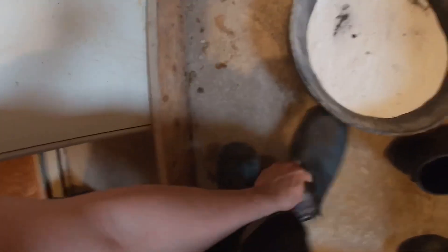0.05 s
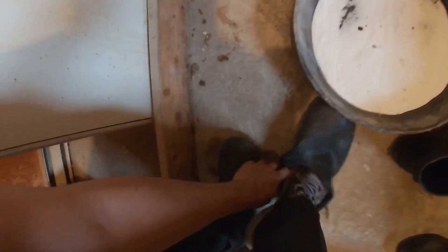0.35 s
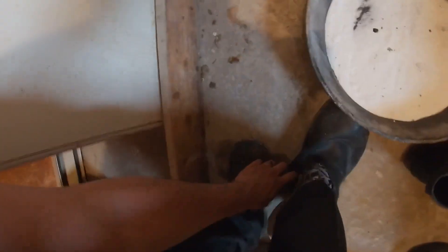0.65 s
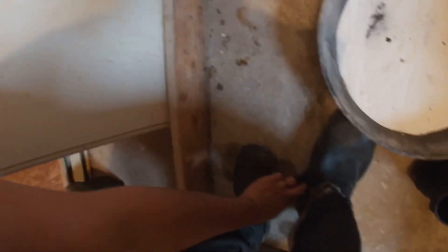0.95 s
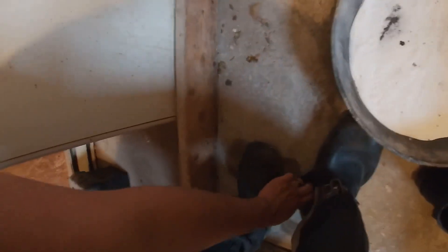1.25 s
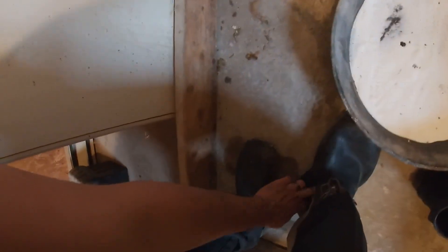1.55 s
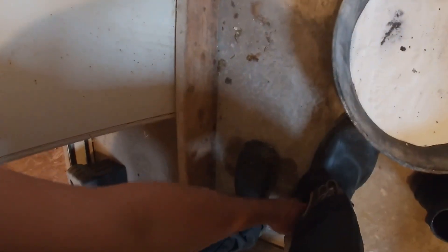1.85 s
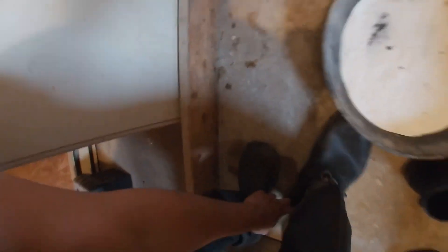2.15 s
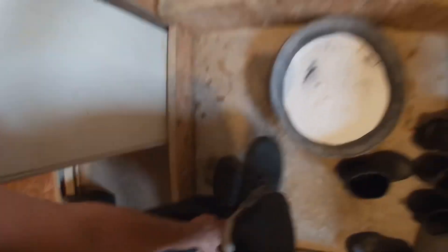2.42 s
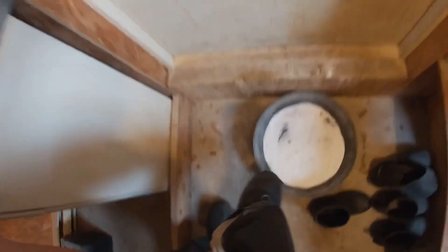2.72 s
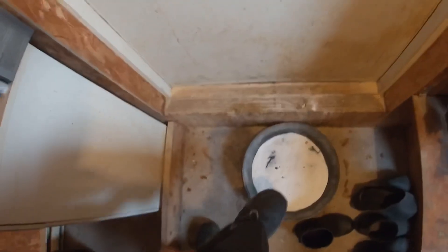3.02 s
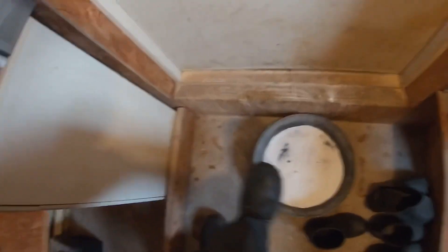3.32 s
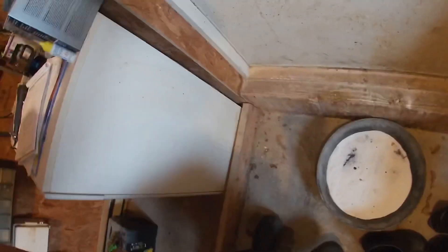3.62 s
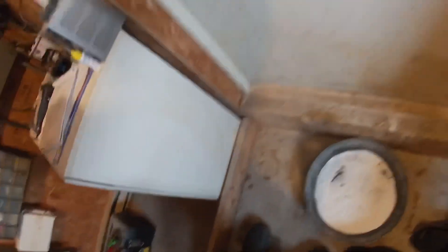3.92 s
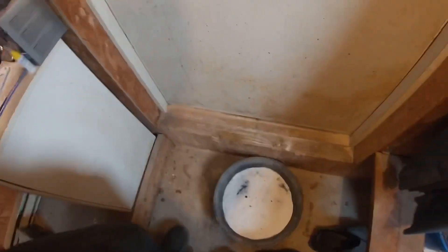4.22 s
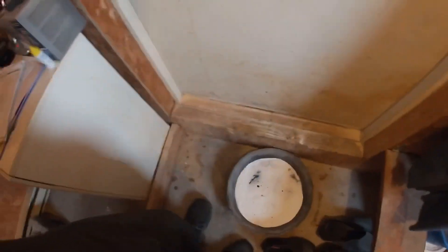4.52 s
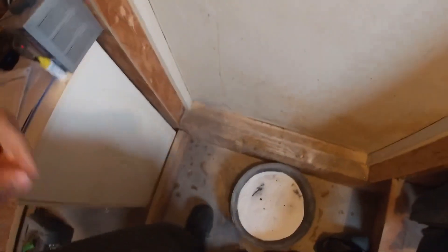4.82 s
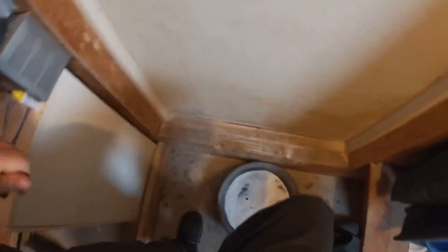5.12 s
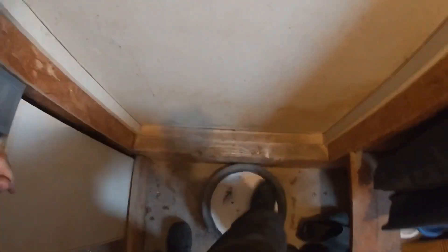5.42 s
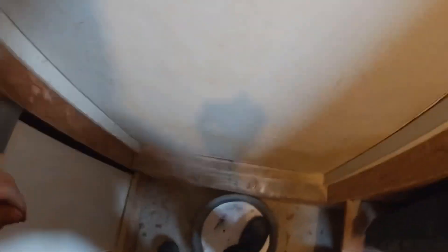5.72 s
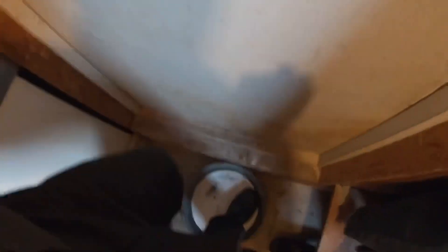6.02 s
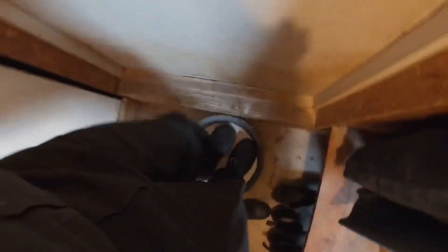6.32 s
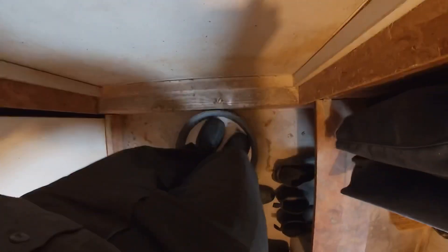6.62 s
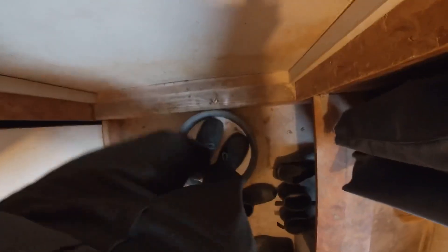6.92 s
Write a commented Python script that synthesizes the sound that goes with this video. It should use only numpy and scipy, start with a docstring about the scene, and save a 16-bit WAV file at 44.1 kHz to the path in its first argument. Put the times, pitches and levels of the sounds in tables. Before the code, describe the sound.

Someone treads into boots and steps onto a pad: hollow knocks, sole scuffs, cloth rustle and faint squeaks over slow ticking.

```python
"""Boots knock and scuff as someone treads into them in a small porch and steps onto a pad in a shallow tub.
Each knock rings the floor and the hollow boot, or the tub once the boots reach it; leather rubs, soles drag and
rubber squeaks on the pad. Trousers swish, a hand-held camera rumbles and gets bumped, and an appliance ticks
about once a second. Just before the fourth second the sound turns bright and hissy, then slowly dulls again
from the top."""
import sys
import numpy as np
from scipy import signal
from scipy.fft import rfft, irfft, next_fast_len
from scipy.io import wavfile
from scipy.ndimage import uniform_filter1d, map_coordinates

SR = 44100
rng = np.random.default_rng(int(sys.argv[2]) if len(sys.argv) > 2 else 0)


def put_to_file(sound):
    """Save the sound as 16-bit audio at rate SR, in the file named by the first command-line argument."""
    columns = np.atleast_2d(sound).T  # one column per channel
    safe = np.clip(columns, -1, 1)
    whole_steps = np.round(safe * 32767)
    wavfile.write(sys.argv[1], SR, whole_steps.astype(np.int16))


N = 315647


def amp(db):
    """Turn decibels into a gain."""
    return 10 ** (np.asarray(db) / 20)


def unit(x):
    """Scale a sound to an average (rms) level of 1."""
    return x / np.sqrt(np.mean(x ** 2) + 1e-20)


def unit_hit(x):
    """Scale a hit so that its loudest 8 ms have an average level of 1."""
    return x / np.sqrt(uniform_filter1d(x ** 2, size=SR // 125).max())


def value_at(points, hz):
    """Read between (pitch_hz, value) points, with octaves evenly spaced."""
    pitches, values = np.transpose(points)
    return np.interp(np.log(hz + 1), np.log(pitches + 1), values)


def wobble(turns_per_s):
    """A smooth random curve."""
    points = rng.standard_normal(int(N * turns_per_s / SR) + 4)
    return map_coordinates(points, [np.arange(N) * turns_per_s / SR])


def add(track, start_s, sound):
    """Mix a sound into the track."""
    part = track[max(round(start_s * SR), 0):][:len(sound)]
    part += sound[:len(part)]


def filtered(x, response):
    """Multiply each frequency of a sound by response(hz)."""
    size = next_fast_len(len(x) + SR // 6)
    return irfft(rfft(x, size) * response(np.fft.rfftfreq(size, 1 / SR)), size)[:len(x)]


def coloured(x, spectrum):
    """Shape a sound's tone with (pitch_hz, level_db) points."""
    return filtered(x, lambda hz: amp(value_at(spectrum, hz)))


def resonate(x, resonances):
    """Pass a sound through an object that rings at several pitches."""
    return filtered(x, lambda hz: sum(amp(db) * 1j * hz * width / (pitch**2 - hz**2 + 1j * hz * width)
                                      for pitch, width, db in resonances))


def band(x, low_hz, high_hz):
    """Keep a band of frequencies at least an octave wide."""
    edges_hz = [low_hz, np.clip(high_hz, 2 * low_hz, SR / 2 - 1)]
    return signal.sosfilt(signal.butter(3, edges_hz, "band", fs=SR, output="sos"), x)


def lowpass(hz, edge_hz, order):
    """A gain that falls above edge_hz; a higher order falls more steeply."""
    return 1 / np.sqrt(1 + (hz / edge_hz) ** (2 * order))


def ping(t, hz, fade_s, attack_s=0.00034):
    """One ringing tone. Here and below, fade_s is the time to fall by 60 dB."""
    return amp(-60 * t / fade_s) * np.sin(2 * np.pi * hz * t) * (1 - np.exp(-t / attack_s))


def friction(spectrum, slips_per_s, rough_db):
    """Rubbing noise: a surface catches and slips many times a second."""
    return unit(coloured(rng.standard_normal(N) * amp(rough_db * wobble(slips_per_s)), spectrum))


def strokes(rows, stretch=1, rise_share=0.44):
    """The gain of a series of swells, each rising a little faster than it falls."""
    power = np.zeros(N)
    for peak_s, db, length_s in rows:
        span_s = stretch * length_s
        start_s = max(peak_s - 2 * span_s, 0)
        t = np.arange(start_s - peak_s, 2 * span_s, 1 / SR)
        slope_s = span_s * np.where(t < 0, rise_share, 1 - rise_share)
        add(power, start_s, amp(db) ** 2 * np.exp(-2 * (t / slope_s) ** 2))
    return np.sqrt(power)


def slipping_tones(rows, partials, spread, sag):
    """Fast sticking and slipping makes fuzzy tones whose pitch sags as each rub slows."""
    out, t = np.zeros(N), np.arange(-SR // 3, SR // 3) / SR
    for peak_s, db, length_s, hz in rows:
        phase = 2 * np.pi * hz * np.cumsum(1 - sag * np.tanh(t / length_s)) / SR
        tone = 0
        for ratio, part_db in partials:
            narrow = signal.butter(2, np.clip(spread * ratio * hz, 5, 2000), fs=SR, output="sos")
            fuzz = signal.sosfilt(narrow, rng.standard_normal((2, len(t))))
            tone += amp(part_db) * unit(fuzz[0] * np.cos(ratio * phase) + fuzz[1] * np.sin(ratio * phase))
        add(out, peak_s + t[0], amp(db) * unit(tone) * np.exp(-(2 * t / length_s) ** 2))
    return out


BRIGHT_START_S, OPEN_S, HOLD_S = 3.875, 0.041, 0.25
DULL_HZ, BRIGHT_HZ, SINK_HZ_PER_S = 3400, 10100, 2130
def treble_edge(s):
    """The highest clear frequency at time s: dull, suddenly bright, then sinking steadily."""
    opened = np.clip((s - BRIGHT_START_S) / OPEN_S, 0, 1)
    sunk_hz = SINK_HZ_PER_S * np.maximum(s - BRIGHT_START_S - OPEN_S - HOLD_S, 0)
    return DULL_HZ + np.maximum(opened * (BRIGHT_HZ - DULL_HZ) - sunk_hz, 0)


def dulled(x, order):
    """Turn down whatever lies above the moving treble edge."""
    hz, s, slices = signal.stft(x, SR, nperseg=512)
    return signal.istft(slices * lowpass(hz[:, None], treble_edge(s), order), SR)[1][:N]


# How long the porch echoes: pitch_hz, fade_s
PORCH_ECHO = [(120, 0.15), (500, 0.22), (2000, 0.2), (6000, 0.21), (14000, 0.081)]
def impact(t, fade_s, rise_s, echo_db):
    """A short burst of force, followed by the echo from the close walls."""
    burst = rng.standard_normal(len(t)) * amp(-60 * t / fade_s) * (1 - np.exp(-t / rise_s))
    hz, age_s, slices = signal.stft(rng.standard_normal(len(t)), SR, nperseg=256)
    fading = amp(-60 * age_s / value_at(PORCH_ECHO, hz)[:, None])
    echo = signal.istft(slices * fading, SR)[1][:len(t)] * (1 - np.exp(-t / 0.0034))
    return unit(burst) + amp(echo_db) * unit(echo)


# The tone of the still air: pitch_hz, level_db
AIR_TONE = [(180, -4), (300, -3), (348, -1), (517, -9), (1140, -24.5), (1560, -22), (2270, -20.5),
            (5260, -20), (11000, -36), (12400, -32), (15400, -47.5)]
def room_air():
    """The room's air makes a faint, steady noise."""
    return amp(-63.5) * unit(coloured(rng.standard_normal(N), AIR_TONE))


# Swells of very high hiss: peak_s, level_db, length_s
HIGH_HISS_SWELLS = [(0.17, -78, 0.2), (1.88, -73, 0.28), (2.3, -85, 0.2), (2.92, -73, 0.22),
                    (3.39, -73, 0.1)]
def high_hiss():
    """A faint, very high airy hiss swells briefly a few times."""
    return strokes(HIGH_HISS_SWELLS) * unit(band(rng.standard_normal(N), 12000, 14200))


# How hard the body moves (crouching, standing up, two steps, treading on the pad): time_s, level_db
BODY_MOTION = [(0.0, -35.5), (2.5, -34), (3.4, -29.5), (3.66, -37), (3.85, -28), (3.925, -14.5),
               (3.96, -41), (4.1, -39.5), (4.43, -26.5), (4.85, -32), (5.42, -37.5), (5.62, -28),
               (7.16, -27)]
def body_motion():
    """The gain of the body's movement, which drives rumble and rubbing."""
    time_s, level_db = np.transpose(BODY_MOTION)
    return amp(np.interp(np.arange(N) / SR, time_s, level_db))


# The tone of the camera's rumble: pitch_hz, level_db
RUMBLE_TONE = [(8.8, -5.5), (15, 5.5), (38, -1), (58, -1), (94, -12.5), (200, -33), (260, -70), (440, -120)]
def camera_rumble():
    """The hand-held camera rumbles as the body moves."""
    return body_motion() * friction(RUMBLE_TONE, slips_per_s=8.2, rough_db=0.9)


# The appliance's ticks: start_s, level_db
TICK_TIMES = [(0.8012, -43.5), (1.8678, -43), (2.938, -46), (4.003, -29), (5.0702, -28), (6.137, -29)]
# How its case rings: pitch_hz, width_hz, level_db
CASE_RINGS = [(1279, 26, 6.5), (1754, 280, 8), (1770, 47, 7.5), (2440, 620, 2), (2760, 130, 2),
              (3060, 100, 4.5), (3770, 170, -9), (4880, 590, -4.5), (5380, 200, -10), (7100, 250, -64),
              (7614, 810, -48)]
def appliance_ticks():
    """A snap and its rebound ring a small case across the room."""
    out, t = np.zeros(N), np.arange(SR // 3) / SR
    for start_s, db in TICK_TIMES:
        snap = resonate(impact(t, fade_s=0.02, rise_s=0.00019, echo_db=12), CASE_RINGS)
        rebound = resonate(impact(t, fade_s=0.011, rise_s=0.00043, echo_db=-2), CASE_RINGS)
        add(out, start_s, amp(db - 3.5) * unit_hit(snap))
        add(out, start_s + 0.0074, amp(db - 8) * unit_hit(rebound))
    return dulled(band(out, 1030, 9900), order=4)


# Fingers on the camera: start_s, level_db, pitch_hz, click_db (added to level_db)
FINGER_TAPS = [(3.919, -19, 190, -12), (3.927, -15.5, 210, -10.5), (4.987, -24, 235, -11),
               (5.289, -33.5, 220, -15)]
def finger_taps():
    """A finger strikes the camera: a dull, dry tap that stops short."""
    out, t = np.zeros(N), np.arange(SR // 12) / SR
    for start_s, db, hz, click_db in FINGER_TAPS:
        burst = rng.standard_normal(len(t)) * amp(-60 * t / 0.018)
        click = amp(click_db) * unit_hit(band(burst, 280, 1100))
        add(out, start_s, amp(db) * (ping(t, hz, fade_s=0.035) + click))
    return out


# Soft heel pushes and bumps of the hand: start_s, level_db, pitch_hz
SOFT_BUMPS = [(0.608, -14.5, 63.6), (0.689, -30.5, 106), (1.049, -26, 38), (1.481, -24, 59),
              (1.913, -23.5, 115), (2.187, -12.5, 89), (3.074, -15.5, 110), (3.131, -19.5, 90),
              (3.19, -21, 126.7), (3.792, -8.5, 75), (3.861, -15.5, 71), (3.926, -12.5, 63.5),
              (4.426, -9, 29), (5.702, -19, 97.5)]
def soft_bumps():
    """A soft push starts stiff, swings once or twice more slowly and is gone."""
    out, t = np.zeros(N), np.arange(SR // 4) / SR
    for start_s, db, hz in SOFT_BUMPS:
        cycles = hz * t + 0.13 * (1 - np.exp(-t / 0.00094))
        swell = (1 - np.exp(-cycles / 0.44)) * np.exp(-cycles / 0.54)
        add(out, start_s, amp(db + 10.5) * swell * np.sin(2 * np.pi * cycles))
    return filtered(out, lambda hz: lowpass(hz, 250, order=6))


def cloth_folds(x, depth_db=1.7):
    """Folding cloth adds small swells, each a few hundred Hz wide and some tens of ms long."""
    slices = signal.stft(x, SR, nperseg=512)[2]
    swells = uniform_filter1d(rng.standard_normal(slices.shape), size=6, axis=0)  # smooth over pitch
    swells = uniform_filter1d(swells, size=7, axis=1)  # and over time
    return unit(signal.istft(slices * amp(depth_db * unit(swells)))[1][:N])


# The tone of rubbing cloth: pitch_hz, level_db
CLOTH_TONE = [(500, 5), (1000, 0), (1400, 1.5), (2000, 2.5), (3100, 0.5), (4400, -2), (6000, -1.5),
              (9400, -5.5), (10600, -2.5), (11700, -9), (14000, -1.5), (15500, -30.5)]
# Cloth brushing cloth: peak_s, level_db, length_s
CLOTH_BRUSHES = [(2.96, -48, 0.21), (3.928, -39, 0.02), (3.974, -47, 0.017), (4.335, -40, 0.17),
                 (4.385, -33, 0.067), (4.48, -51, 0.066), (4.635, -39.5, 0.059), (4.79, -70, 0.062),
                 (4.93, -53.5, 0.12), (5.25, -53.5, 0.1), (5.531, -52, 0.018), (5.573, -33.5, 0.098),
                 (5.725, -37, 0.094), (5.83, -49, 0.13), (5.955, -47.5, 0.063), (6.298, -44.5, 0.039),
                 (6.452, -41, 0.074), (6.615, -45, 0.042), (6.99, -45, 0.07)]
# Ribbed cloth zipping past itself: peak_s, level_db, length_s, pitch_hz
CLOTH_ZIPS = [(3.974, -48, 0.018, 3700), (4.16, -59, 0.05, 5500), (4.475, -50.5, 0.081, 7730),
              (5.735, -47, 0.051, 5530)]
HISS_EARLY_DB, HISS_LATE_DB, HISS_EASE_S = -46.5, -56, 0.38
def trousers():
    """Cloth brushes in grainy strokes and its ribs zip; a fine hiss joins when the sound turns bright."""
    bright_for_s = np.maximum(np.arange(N) / SR - BRIGHT_START_S, 0)
    hiss_db = HISS_LATE_DB + (HISS_EARLY_DB - HISS_LATE_DB) * np.exp(-bright_for_s / HISS_EASE_S)
    hiss_db += 0.9 * wobble(7)
    sliding = amp(-13) * strokes(CLOTH_BRUSHES, stretch=1.2)  # soft sliding around each brush
    hiss_gain = np.clip(bright_for_s / OPEN_S, 0, 1) * np.hypot(amp(hiss_db), sliding)
    hiss = hiss_gain * cloth_folds(coloured(rng.standard_normal(N), CLOTH_TONE))
    brushes = strokes(CLOTH_BRUSHES) * cloth_folds(friction(CLOTH_TONE, slips_per_s=450, rough_db=2))
    zips = slipping_tones(CLOTH_ZIPS, [(1, -2), (1.9, -8)], spread=0.06, sag=0.02)
    return dulled(hiss + brushes + zips, order=6)


# Twists on the pad: peak_s, level_db, length_s, pitch_hz
PAD_SQUEAKS = [(5.532, -42, 0.021, 1210), (5.605, -44, 0.068, 1010), (5.735, -40.5, 0.06, 991),
               (5.8, -45, 0.058, 992), (6.70, -54.5, 0.224, 2050), (6.92, -58, 0.12, 2100)]
# The tones in one squeak: pitch_ratio, level_db
SQUEAK_TONES = [(1, 2.5), (1.34, -5), (1.49, -8), (2, -18)]
def rubber_squeaks():
    """Rubber sticks and slips with a rough squeak as the soles twist on the pad."""
    return slipping_tones(PAD_SQUEAKS, SQUEAK_TONES, spread=0.035, sag=0.008)


def foot_settling(rise_s=0.016, settle_s=0.032):
    """The gain of the foot's brief slide after each boot knock; harder knocks slide louder."""
    power, t = np.zeros(N), np.arange(SR // 2) / SR
    slide = (1 - np.exp(-t / rise_s)) * np.exp(-t / settle_s)
    for start_s, db, *_ in BOOT_KNOCKS:
        add(power, start_s, (amp(db) * slide) ** 2)
    return np.sqrt(power)


# The tone of rubbing leather: pitch_hz, level_db
LEATHER_TONE = [(80, -13.5), (130, 19), (200, 14), (330, 5), (450, -2.5), (650, -38.5), (1200, -91)]
# Leather bending around the foot: peak_s, level_db, length_s
LEATHER_BENDS = [(0.15, -44, 0.33), (2.03, -42, 0.26), (2.84, -49.5, 0.71), (3.24, -42, 0.033),
                 (3.67, -41, 0.21), (4.38, -37, 0.16), (5.95, -38.5, 0.13), (7.06, -39, 0.17)]
def leather_rubs():
    """The foot rubs inside the leather as the body moves, the foot settles and the boot bends."""
    moving = amp(-23.5) * body_motion() + amp(-19) * foot_settling()
    return np.hypot(moving, strokes(LEATHER_BENDS)) * friction(LEATHER_TONE, slips_per_s=73, rough_db=4.5)


# The tone of a sliding sole: pitch_hz, level_db
SOLE_TONE = [(300, -12), (500, 3), (1000, -5), (1500, -7), (2200, -12.5), (3200, -18), (5000, -26),
             (11500, -42.5), (12700, -44), (14000, -43.5), (15500, -52)]
# Soles dragged over the floor: peak_s, level_db, length_s
SOLE_DRAGS = [(0.005, -53, 0.11), (0.18, -39, 0.19), (0.51, -41.5, 0.15), (1.05, -51.5, 0.16),
              (1.98, -57, 0.41), (2.335, -46.5, 0.075), (2.86, -46, 0.2), (2.98, -44.5, 0.13),
              (3.85, -36.5, 0.11), (4.07, -47.5, 0.11), (4.28, -45, 0.18), (4.385, -31.5, 0.084),
              (4.635, -38, 0.084), (4.78, -54.5, 0.75), (5.6, -60, 0.027), (5.76, -45, 0.095),
              (5.98, -47.5, 0.15), (7.005, -38, 0.069)]
# How the dragging sole rings: pitch_hz, width_hz, level_db
TREAD_RINGS = [(326, 114, 12), (545, 45, 6), (710, 75, -8), (990, 66, -14.5), (1310, 42, -4),
               (2110, 580, -34.5)]
def sole_scuffs():
    """Soles shuffle unevenly; in a drag the tread catches and rings, and grains of dirt snap under it."""
    drag = strokes(SOLE_DRAGS)
    shuffle = body_motion() * amp(-27.5 - wobble(4.93)) + amp(-28) * foot_settling()
    hiss = np.hypot(shuffle, amp(-9) * drag) * friction(SOLE_TONE, slips_per_s=70, rough_db=2)
    catches = rng.standard_normal(N) * amp(4 * wobble(160))
    tread = unit(band(resonate(catches, TREAD_RINGS), 263, 1660))
    snaps = (rng.random(N) < 70 / SR) * rng.standard_normal(N)  # about 70 grains a second
    dirt = amp(-31.5) * unit(band(snaps, 1500, 4500))
    return hiss + drag * (tread + dirt)


# The tone of grit before the sound turns bright: pitch_hz, level_db
GRIT_TONE = [(2200, -35), (3300, -4.5), (5500, -9), (8000, -22), (11200, -27), (12300, -12), (14000, -17),
             (15500, -33.5)]
def grit_crunch(t, start_s, fade_s):
    """Grit crushed under the sole; once the sound has turned bright it reaches up to the treble edge."""
    force = impact(t, fade_s, rise_s=0.00044, echo_db=-3)
    if start_s < BRIGHT_START_S:
        return coloured(force, GRIT_TONE)
    return filtered(band(force, 3500, 12000), lambda hz: lowpass(hz, treble_edge(start_s), order=5))


# How boot and floor ring together: pitch_hz, width_hz, level_db
FLOOR_RINGS = [(137.2, 43, 6.5), (184, 22, 4.5), (223.5, 57, 0), (300.4, 14, -6.5), (353, 72, -3.5),
               (498, 72, 10), (554, 40, 5), (657, 72, 9.5), (795, 110, 4.5), (950, 130, -3.5),
               (1073, 34, -8), (1320, 230, -13), (1440, 56, -18), (1912, 740, 3), (2600, 610, -11),
               (2978, 570, -20)]
# How the sole's stiff edge rings: pitch_hz, width_hz, level_db
SOLE_EDGE_RINGS = [(1243, 410, 19), (1470, 230, 5), (2020, 390, -3.5), (2440, 170, -8), (2930, 150, 0.5)]
# The tones of the hollow boot, or of the tub once the boots reach it: pitch_ratio, level_db, fade_s
HOLLOW_TONES = [(1, 1.5, 0.125), (1.44, -1, 0.12), (2.04, -0.5, 0.12), (2.26, -8.5, 0.086)]
# Each time a boot lands: start_s, level_db, thud_db, slap_db, grit_db, ring_hz, ring_db, boom_db, fade_s
# (the later levels are added to level_db)
BOOT_KNOCKS = [(0.184, -31, -8.5, -14, -38, 345, -2, -15, 0.022),
               (0.448, -39.5, -4, 14, 3.5, 448, -8, -2, 0.3),
               (0.477, -39, 8.5, -12, -28, 447, -5, 21.5, 0.08),
               (0.561, -31, 1, -1.5, -20, 446, -8.5, 4, 0.016),
               (0.613, -31.5, -2, -9.5, -23, 189, -8, 3, 0.022),
               (1.001, -40, -4.5, -11, -29, 241, -7, -1, 0.019),
               (1.476, -37.5, -0.5, -3, -8, 437, -6, -11, 0.048),
               (2.214, -41.5, 12, -14, -16, 208, 4, 3, 0.013),
               (2.347, -24.5, -4.5, -6, -29, 281, 2, -10, 0.012),
               (2.368, -39, -14, -24, -40, 347, 10, -5, 0.0088),
               (3.015, -20, -6, 6, -12, 363.3, -9.5, 6, 0.024),
               (3.327, -22, -18, -9.5, -21, 383, -4, -5, 0.08),
               (3.333, -18.5, -7.5, -15, -27, 388.3, -4, 5, 0.037),
               (3.765, -18.5, -6, -5, -36, 329, -2, -13, 0.056),
               (3.772, -10.5, -3.5, -11, -36, 302.3, -9.5, -11, 0.042),
               (3.789, -23.5, 5, -8, -38, 285.4, 4.5, 4, 0.022),
               (5.523, -31.5, -8, -3, 0.5, 330, -7, -10, 0.045),
               (5.547, -23.5, 1, -2, -15, 337, -2, -3, 0.025),
               (5.554, -14, -5, -4, -11.5, 337, -8.5, -7, 0.011),
               (6.414, -20, -3, -22, -38, 294, -8, -15, 0.019),
               (6.427, -17, 0, -6.5, -28, 290, -7.5, -14, 0.021),
               (6.469, -23.5, -12, -6.5, -29, 340, -8.5, -12, 0.0061),
               (6.503, -29, -1.5, -9.5, -25, 390, -9, -10, 0.0083),
               (6.572, -33, 4.5, -23, -38, 312, 0, -15, 0.048),
               (6.664, -42.5, 3, -18, -32, 481, -8.5, 0, 0.028),
               (6.783, -25, -0.5, -13.5, -17, 205, -3, -10, 0.065),
               (6.8, -29, 3.5, -19, -30, 240, -4, 0, 0.026),
               (6.943, -37.5, 7, -18, -7.5, 334, -6, -8, 0.053),
               (7.019, -40, 6, -20, -23, 337, -10, -1, 0.02),
               (7.077, -36, -6, -23, -38, 383, -4, -8, 0.014),
               (7.141, -20, -1.5, -25, -20, 367, -7, -9, 0.13),
               (7.15, -19, 7, -17, -21, 384.5, -2.5, -2, 0.06)]
REACHES_TUB_S, WALL_ECHO_DB = 2.7, -4.5
def boot_knocks():
    """Each landing knocks the floor, rings the hollow boot (or the tub, once the boots reach it), makes the
    porch boom and crushes some grit."""
    out, t = np.zeros(N), np.arange(SR // 3) / SR
    for start_s, db, thud_db, slap_db, grit_db, ring_hz, ring_db, boom_db, fade_s in BOOT_KNOCKS:
        floor = resonate(impact(t, fade_s, rise_s=0.0016, echo_db=WALL_ECHO_DB), FLOOR_RINGS)
        thud = amp(thud_db) * unit_hit(band(floor, 92.6, 353))
        knock = amp(-5) * unit_hit(band(floor, 318, 1140))
        # The stiff edge lets go sooner than the soft heel; a harder slap reaches higher.
        edge = resonate(impact(t, 0.72 * fade_s, rise_s=0.0035, echo_db=WALL_ECHO_DB), SOLE_EDGE_RINGS)
        slap_top_hz = min(3690, 5000 * 2 ** (slap_db / 15))
        slap = amp(slap_db - 5) * unit_hit(band(edge, 830, slap_top_hz))
        grit = amp(grit_db - 9.5) * unit_hit(grit_crunch(t, start_s, 0.5 * fade_s))
        # On the bare floor the boot rings duller and the heel clacks higher; in the tub the tub rings brighter
        # and the clack is lower.
        db_per_octave, clack_hz = (-13, 1470) if start_s < REACHES_TUB_S else (-1, 1030)
        hollow = sum(amp(tone_db + db_per_octave * np.log2(ratio))
                     * ping(t, ratio * ring_hz, tone_fade_s, attack_s=0.00097)
                     for ratio, tone_db, tone_fade_s in HOLLOW_TONES)
        ring = amp(ring_db) * unit_hit(hollow)
        clack = amp(slap_db - 8) * ping(t, clack_hz, fade_s=0.073)
        boom = amp(boom_db) * ping(t, hz=132.6, fade_s=0.14, attack_s=0.0039)
        add(out, start_s, amp(db) * (thud + knock + slap + grit + ring + clack + boom))
    return out


def scene():
    """Add all the sources into one channel."""
    hits = boot_knocks() + soft_bumps() + finger_taps() + appliance_ticks()
    noises = leather_rubs() + sole_scuffs() + high_hiss() + rubber_squeaks() + trousers()
    return (hits + noises + camera_rumble() + room_air())[None]


def record(dry):
    """Fade out over the last 3 ms to avoid a click, and cut the very highest treble."""
    fade_out = np.clip((N - np.arange(N)) / SR / 0.003, 0, 1)
    return np.array([filtered(channel * fade_out, lambda hz: hz < 15100) for channel in dry])


dry = scene()
out = record(dry)
put_to_file(out)
```